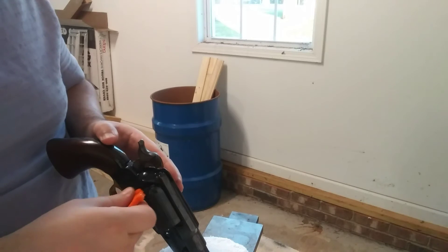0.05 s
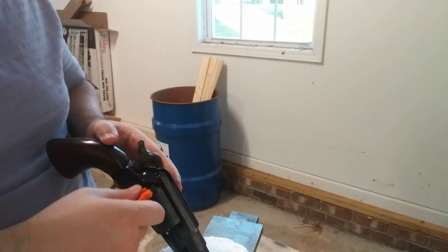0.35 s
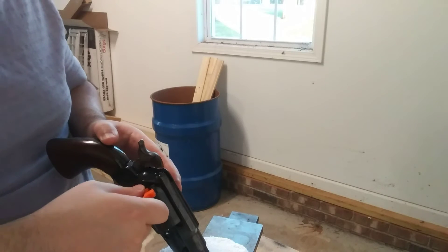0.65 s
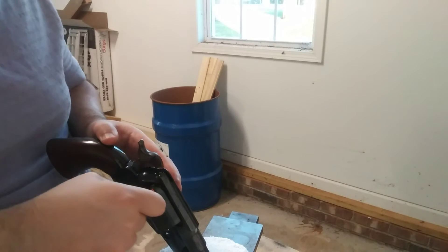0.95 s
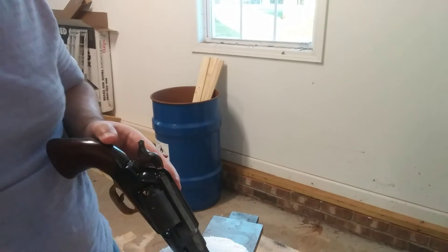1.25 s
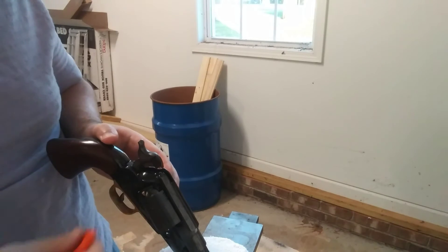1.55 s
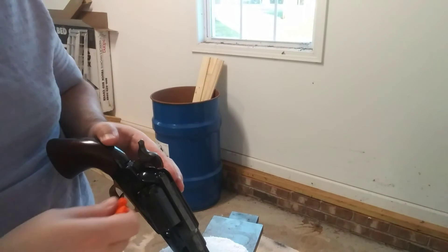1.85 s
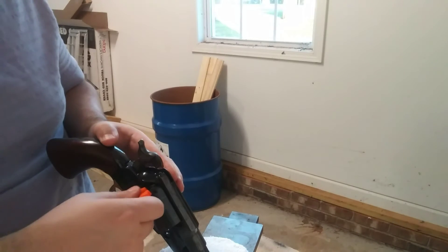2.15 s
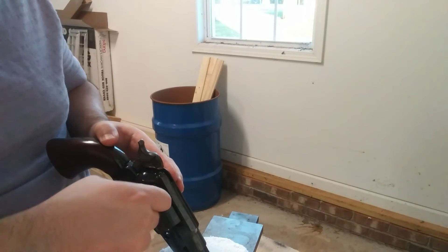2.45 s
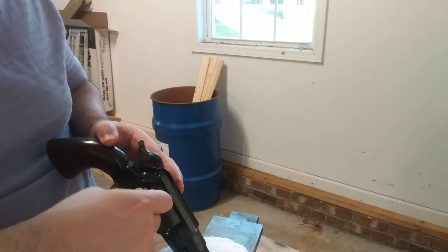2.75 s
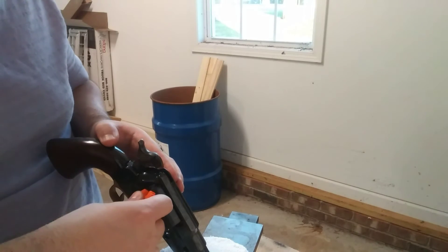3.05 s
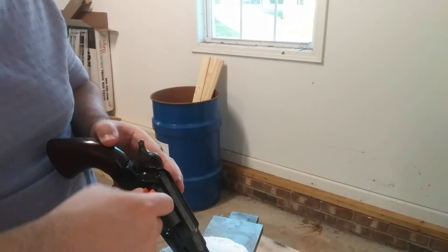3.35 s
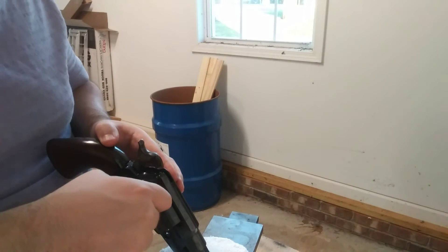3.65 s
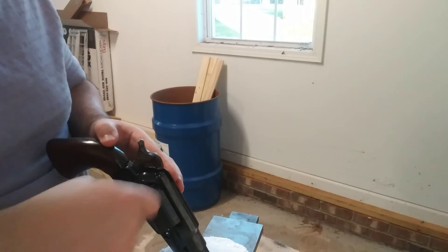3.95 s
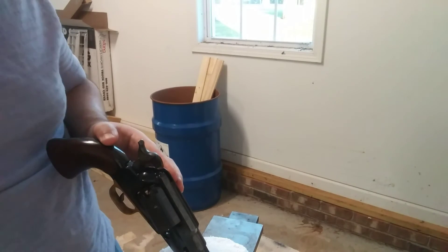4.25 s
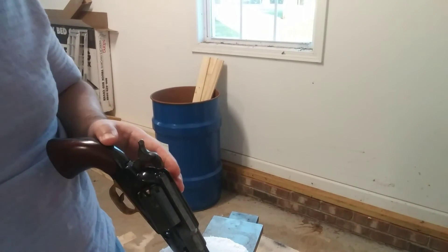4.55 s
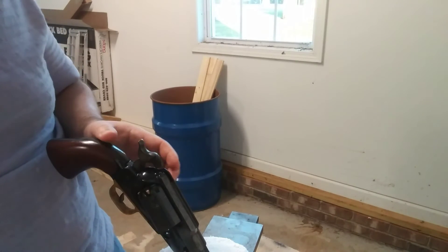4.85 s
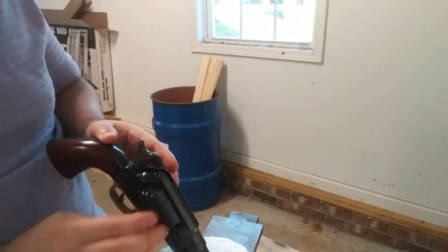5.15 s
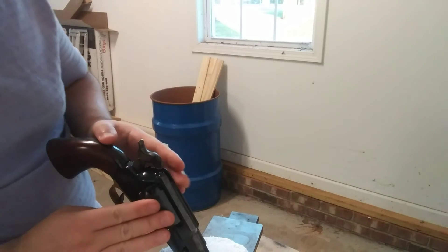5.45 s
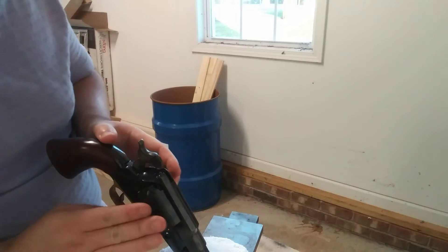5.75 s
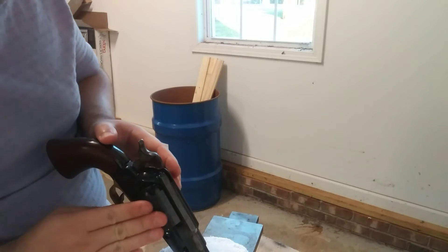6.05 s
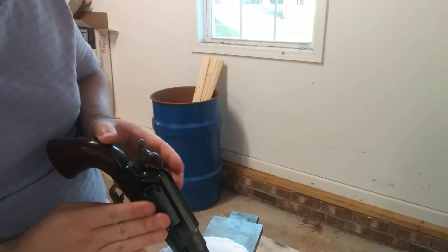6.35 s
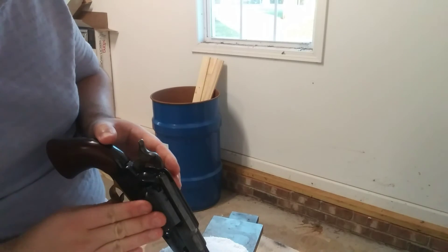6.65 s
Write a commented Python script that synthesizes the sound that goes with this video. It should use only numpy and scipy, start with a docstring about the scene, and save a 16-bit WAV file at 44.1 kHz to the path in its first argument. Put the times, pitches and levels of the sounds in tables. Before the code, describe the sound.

A revolver handled in a small quiet room: three sharp metallic clicks, with faint finger slips and a few soft hollow knocks.

```python
"""A revolver's action snaps into its next stop three times: steel chatters on steel, the frame rings.
Fingers rub the gun, press small caps onto the cylinder and slip off; snaps and slips jolt it in the palm.
The hollow body knocks a few times as the grip shifts. The small, quiet, hard-walled room answers with
echoes, a short tail and a low hum after each snap, over a faint steady hiss."""
import sys
import numpy as np
from scipy import signal
from scipy.fft import rfft, irfft
from scipy.io import wavfile
from scipy.ndimage import uniform_filter1d

SR = 44100
rng = np.random.default_rng(int(sys.argv[2]) if len(sys.argv) > 2 else 0)


def inscribe(sig):
    """Save sig as 16-bit PCM at rate SR to the path in sys.argv[1].

    A 1-D sig is mono; a 2-D sig holds one channel per row.
    Samples are clipped to [-1, 1] before scaling.
    """
    pcm = np.round(np.clip(np.atleast_2d(sig).T, -1, 1) * 32767)
    wavfile.write(sys.argv[1], SR, pcm.astype(np.int16))


N = 299439
T = np.arange(SR // 2) / SR  # time in one event, s

# Hiss spectrum. Each row: frequency in Hz, relative density in dB.
HISS_SPECTRUM = [(15, -53), (25, -19), (80, -33.5), (96, -8), (157, -11), (291, 0), (812, -4.5), (929, -6),
                 (1320, -7), (2520, -11.5), (3300, -11), (5820, -21.5), (7830, -23), (13800, -16),
                 (15800, -20.5)]
# Room tail. Each row: frequency in Hz, level in dB, T60 in seconds.
ROOM_TAIL = [(130, 2, 0.53), (350, -2, 0.31), (800, -2, 0.54), (1520, -3, 0.62), (3714, -9.5, 0.67),
             (5940, -12, 0.58), (9700, -11, .39), (14520, -16.5, 0.38)]
# Early echoes. Each row: delay in seconds, gain in dB.
ROOM_ECHOES = [(.0058, -20), (.0093, -21), (.0137, -16), (0.0192, -32.5), (.0255, -23), (0.0485, -36.5)]
# Stereo spread of the treble. Each row: time in seconds, side gain in dB.
TREBLE_SPREAD = [(.8, -44), (1.18, -19), (1.7, -65), (3.5, -35), (4, -20), (5.56, -14), (6.2, -6.5)]
# Fingertip rubs. Each row: peak time in seconds, level in dB, fall in seconds, centre in Hz.
RUBS = [(.607, -66, .002, 6300), (.657, -63.5, .002, 7000), (.939, -62.5, .0015, 9500),
        (3.4505, -55.5, .0055, 7900), (3.4625, -54, .0021, 8400), (4.725, -69.5, .25, 12000),
        (4.777, -55, .0008, 10100)]
# Finger slips. Each row: peak time in seconds, level in dB, centre in Hz, release delay in seconds,
# drag width in octaves.
SLIPS = [(1.1842, -34.8, 5900, .002, 1.0), (3.9898, -38, 4950, .0033, 3)]
# Caps seating. Each row: start in seconds, level in dB, decay in seconds.
CAP_PINGS = [(.7642, -46, .0012), (3.4682, -48.5, .0019)]
# Gun in the palm. Each row: mode in Hz, level in dB, T60 in seconds.
GRIP_MODES = [(132, -9.5, 0.073), (204, -9, 0.081), (339.7, -5, 0.097), (375, -4, 0.067),
              (487.4, 1.5, 0.023)]
# Jolt and settling after a slip. Each row: delay in seconds, level in dB re the slip, pitch factor.
SLIP_JOLTS = [(.004, -9, 1.09), (.015, -9, 1.0)]
# Hollow body. Each row: mode in Hz, level in dB, T60 in seconds.
BODY_MODES = [(194.3, -32, 0.07), (336.3, -8.5, 0.034), (481.4, -5, .036), (545, 0, 0.058),
              (677, -4, 0.038), (794, -7, 0.04), (918, -4, 0.055), (1020, -5.5, .025), (1252, -3.5, 0.056),
              (1380, -5, .022), (1517, 0, 0.023), (1980, -15.5, .02), (2386, 2.5, 0.013)]
# Knocks. Each row: start in seconds, level in dB, corner in Hz (higher is harder).
KNOCKS = [(4.7228, -18, 600), (4.7947, -22.5, 540), (4.8384, -26.5, 520), (4.867, -36, 620),
          (4.906, -39, 600), (4.9657, -28, 1600), (5.0278, -30.5, 1200)]
# Steel frame, struck at another spot by each stop. Each row: mode in Hz, T60 in seconds,
# level in dB at the first, second and third stop.
FRAME_MODES = [(395, 0.11, -18.5, -20.5, -13), (655.4, .10, -14.5, -7, -24), (842, 0.041, -6.5, -16, -9.5),
               (1163, 0.072, -11.5, -4.5, -10), (1255, 0.04, -20, -11, -5.5),
               (1340, 0.044, -3.5, -5, -10.5), (1466, .09, -16.5, -12.5, -3), (1560, .025, -14, -13, -12.5),
               (1960, 0.023, -19.5, -4.5, -3), (2197, .025, -8.5, -15, -9), (2740, .016, -0.5, 4.5, 4.5),
               (3318, .014, -0.5, -13, 0), (3462, .03, 7, 5, 9), (3883, .014, 2.5, 6.5, 4),
               (3950, .014, -11, 7, -17), (6188, 0.0075, -4, -16, -18), (6540, 0.0064, -0.5, -13, -16),
               (7500, 0.011, 9.5, 3.5, -2), (8960, .008, 10.5, 11.5, -14.5), (9100, 0.011, 5.5, 7, 9.5),
               (10320, 0.013, -4.5, 0, 3), (12420, .005, 0, 8.5, -15), (14900, .003, 3, -2, -3)]
# Steel-on-steel crack. Each row: frequency in Hz, relative level in dB.
CRACK_SPECTRUM = [(60, -53.5), (300, -14.5), (700, -7), (1500, -2), (2100, -6.5), (3600, 2.5), (4500, 2.5),
                  (5600, -8), (8600, 4), (11500, -2.5), (15500, 3.5), (17000, -13)]
# Snaps of the action. Each row: start in seconds, ring in dB, crack in dB, crack decay in seconds,
# tilt in dB per octave, rebound delay in seconds, rebound in dB re the crack, run-up in dB,
# jolt in dB, room boom in dB.
SNAPS = [(1.7943, -25.5, -16, .0023, 0, .0064, -12, -43, -57, -65),
         (5.5640, -26.5, -17, .0024, 0, .008, -14, -38, -45, -50),
         (6.1762, -26.5, -20, .0034, -.6, .0098, -11.5, -29, -50.5, -55)]


def amp(db):
    """Decibels to gain."""
    return 10 ** (np.asarray(db) / 20)


def unit(x):
    """Scale to rms 1."""
    return x / np.sqrt(np.mean(x ** 2) + 1e-20)


def curve_at(points, hz):
    """Interpolate (Hz, value) points over log frequency."""
    point_hz, value = np.transpose(points)
    return np.interp(np.log(hz + 1), np.log(point_hz + 1), value)


def add(mix, start_s, sound):
    """Mix a sound in at start_s."""
    part = mix[max(round(start_s * SR), 0):][:len(sound)]
    part += sound[:len(part)]


def high_pass(x, hz, order=2):
    """Butterworth high-pass."""
    return signal.sosfilt(signal.butter(order, hz, "highpass", fs=SR, output="sos"), x)


def noise(size, colour):
    """Noise of rms 1, shaped by the gain function colour(hz)."""
    hz = np.fft.rfftfreq(size, 1 / SR)
    return unit(irfft(rfft(rng.standard_normal(size)) * colour(hz), size))


def ring(modes, swell_cycles=1.0):
    """Decaying sines of alternating sign, each with a short build-up."""
    out = np.zeros(len(T))
    for k, (hz, db, t60_s) in enumerate(modes):
        envelope = amp(db - 60 * T / t60_s) * (1 - np.exp(-T * hz / swell_cycles))
        out += (-1) ** k * envelope * np.sin(2 * np.pi * hz * T)
    return out


def background(hiss_db=-66.5, whine_db=-91, whine_hz=14000):
    """Steady room air and hiss, with a very faint high whine."""
    air = noise(N, lambda hz: amp(curve_at(HISS_SPECTRUM, hz)))
    whine = np.sin(2 * np.pi * whine_hz * np.arange(N) / SR)
    return amp(hiss_db) * air + amp(whine_db) * whine


def room(x, build_up_s=.0045):
    """Wall reflections: a few single echoes and a dense, decaying tail."""
    hz, t, spectrum = signal.stft(rng.standard_normal(SR), SR, nperseg=256)
    level_db = curve_at([row[:2] for row in ROOM_TAIL], hz)[:, None]
    t60_s = curve_at([row[::2] for row in ROOM_TAIL], hz)[:, None]
    energy_norm = np.sqrt(2 * np.log(1000) / (t60_s * SR))
    spectrum *= amp(level_db - 60 * t / t60_s) * energy_norm
    build_up = 1 - np.exp(-(np.arange(SR) / SR / build_up_s) ** 2)
    response = signal.istft(spectrum, SR, nperseg=256)[1][:SR] * build_up
    for delay_s, db in ROOM_ECHOES:
        add(response, delay_s, amp([db]))
    return signal.fftconvolve(x, response)[:N]


def room_booms(mode_hz=135, t60_s=.32, delay_s=.004):
    """Each snap excites a standing wave between the walls."""
    out = np.zeros(N)
    for at_s, *_, boom_db in SNAPS:
        add(out, at_s + delay_s, ring([(mode_hz, boom_db, t60_s)], swell_cycles=2.2))
    return out


def add_slide(mix, peak_s, db, rise_s, fall_s, hz, octaves):
    """Mix in one slide: grainy friction swells and lets go through a resonance at hz."""
    def colour(bin_hz):
        """Resonant hump, rolled off from an octave above its centre."""
        hump = 1 / np.hypot(1, 1.2 * np.log2((bin_hz + 1) / hz) / octaves)
        return hump / np.hypot(1, (bin_hz / hz / 2) ** 2)
    lead_s, grain_db = .03, 2.9
    roughness = unit(uniform_filter1d(rng.standard_normal(len(T)), size=20))
    grain = unit(amp(grain_db * roughness))
    stroke = np.exp(-np.maximum((lead_s - T) / rise_s, (T - lead_s) / fall_s))
    add(mix, peak_s - lead_s, amp(db) * noise(len(T), colour) * grain * stroke)


def friction(soft_knock_hz=580, scuff_db_per_octave=9, grit_db_per_octave=21):
    """Fingers rub and slip on steel; each snap, cap and knock brings its own short slides."""
    out = np.zeros(N)
    for at_s, db, fall_s, hz in RUBS:
        add_slide(out, at_s, db, rise_s=.0011, fall_s=fall_s, hz=hz, octaves=.38)
    for at_s, db, hz, release_s, drag_octaves in SLIPS:  # finger slips, skin drags, finger snaps free
        add_slide(out, at_s, db, rise_s=.0014, fall_s=.0026, hz=hz, octaves=.36)
        add_slide(out, at_s + .0025, db - 10, rise_s=.0046, fall_s=.005, hz=2400, octaves=drag_octaves)
        add_slide(out, at_s + release_s, db - 4.5, rise_s=.0008, fall_s=.0013, hz=8500, octaves=.9)
    for at_s, *_, run_up_db, _, _ in SNAPS:  # bolt slides just before the snap
        add_slide(out, at_s - .0026, run_up_db, rise_s=.0008, fall_s=.0033, hz=11000, octaves=2.3)
    for at_s, db, _ in CAP_PINGS:  # cap chafes, fingertip fizzes on it
        add_slide(out, at_s + .0027, db - 8, rise_s=.0032, fall_s=.0028, hz=2250, octaves=.3)
        add_slide(out, at_s + .002, db - 16, rise_s=.0025, fall_s=.0018, hz=9200, octaves=.5)
    for at_s, db, corner_hz in KNOCKS:  # grip scuffs, contact grates
        hardness_octaves = np.log2(corner_hz / soft_knock_hz)
        scuff_db = db - 28 + scuff_db_per_octave * hardness_octaves
        grit_db = db - 38.5 + grit_db_per_octave * hardness_octaves
        add_slide(out, at_s + .001, scuff_db, rise_s=.0006, fall_s=.022, hz=1550, octaves=.26)
        add_slide(out, at_s + .0033, grit_db, rise_s=.0019, fall_s=.0045, hz=1400, octaves=2)
    return high_pass(out, hz=300)


def cap_pings(cap_hz=2200):
    """A cap pressed home rings briefly under the finger."""
    out = np.zeros(N)
    for at_s, db, decay_s in CAP_PINGS:
        envelope = T / decay_s * np.exp(1 - T / decay_s)
        add(out, at_s, amp(db) * envelope * np.sin(2 * np.pi * cap_hz * T))
    return out


def palm_jolts(snap_delay_s=.002, snap_pitch=1.03):
    """The gun's mass thuds against the palm: once per snap, twice per slip."""
    out = np.zeros(N)
    thuds = [(at_s + snap_delay_s, jolt_db, snap_pitch) for at_s, *_, jolt_db, _ in SNAPS]
    for at_s, slip_db, *_ in SLIPS:
        thuds += [(at_s + delay_s, slip_db + db, pitch) for delay_s, db, pitch in SLIP_JOLTS]
    for at_s, db, pitch in thuds:
        modes = [(hz * pitch, mode_db, t60_s) for hz, mode_db, t60_s in GRIP_MODES]
        add(out, at_s, amp(db) * ring(modes))
    return out


def body_knocks():
    """Soft blows reach only the hollow body's low modes; harder ones reach higher."""
    out = np.zeros(N)
    for at_s, db, corner_hz in KNOCKS:
        modes = [(hz, mode_db - 10 * np.log10(1 + (hz / corner_hz) ** 7.2), t60_s)
                 for hz, mode_db, t60_s in BODY_MODES]
        add(out, at_s, amp(db) * ring(modes))
    return out


def frame_ring():
    """Each snap rings the steel frame; the hand damps it quickly."""
    out = np.zeros(N)
    for stop, (at_s, ring_db, *_) in enumerate(SNAPS):
        modes = [(hz, stop_db[stop], t60_s) for hz, t60_s, *stop_db in FRAME_MODES]
        add(out, at_s, amp(ring_db) * ring(modes, swell_cycles=1.5))
    return high_pass(out, hz=260)  # a small body radiates little bass


def action_clicks(tail_db=-17.5, tail_s=.0088):
    """Steel chatters on steel for a few milliseconds; the bolt rebounds once."""
    out = np.zeros(N)
    for at_s, _, crack_db, decay_s, tilt_db, rebound_s, rebound_db, *_ in SNAPS:
        envelope = np.exp(-(T / decay_s) ** 2) + amp(tail_db) * np.exp(-T / tail_s)
        for hit_s, db in ((at_s, crack_db), (at_s + rebound_s, crack_db + rebound_db)):
            chatter = noise(len(T), lambda hz: amp(curve_at(CRACK_SPECTRUM, hz) + tilt_db * np.log2(hz + 1)))
            add(out, hit_s, amp(db) * chatter * envelope)
    return high_pass(out, hz=280)


def scene():
    """Sound sits in the centre; only the treble spreads to the sides, by an amount that changes over time."""
    # Each pair: source, send to the walls in dB.
    sources = [(action_clicks(), 1.5), (frame_ring(), -1.5), (friction() + cap_pings(), -1.5),
               (palm_jolts(), -.5), (body_knocks(), -1.5)]
    direct = sum(sound for sound, _ in sources)
    reflected = room(sum(amp(send_db) * sound for sound, send_db in sources))
    mid = high_pass(direct + reflected + room_booms(), hz=70)
    treble = high_pass(mid, hz=4700, order=14)
    smear = noise(size=128, colour=np.ones_like)  # scrambles phase over 3 ms
    side_db = np.interp(np.arange(N) / SR, *np.transpose(TREBLE_SPREAD))
    side = amp(side_db) * np.convolve(treble, smear / np.linalg.norm(smear))[:N]
    return np.array([mid + side, mid - side]) + background()


def record(dry):
    """Steep low-pass band limit."""
    cutoff_hz = 16150
    taps = signal.firwin(301, cutoff_hz, window=("kaiser", 8), fs=SR)
    return signal.oaconvolve(dry, taps[None], "same")


dry = scene()
out = record(dry)
inscribe(out)
```